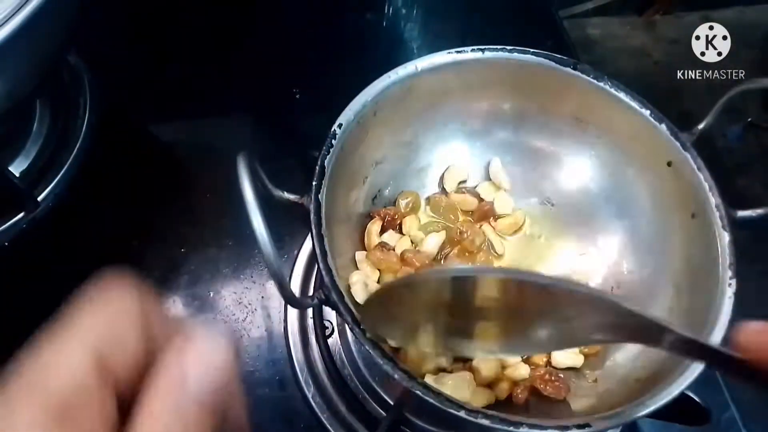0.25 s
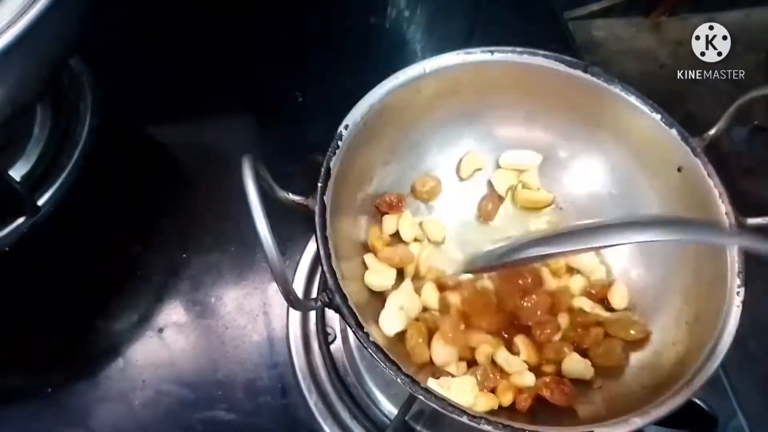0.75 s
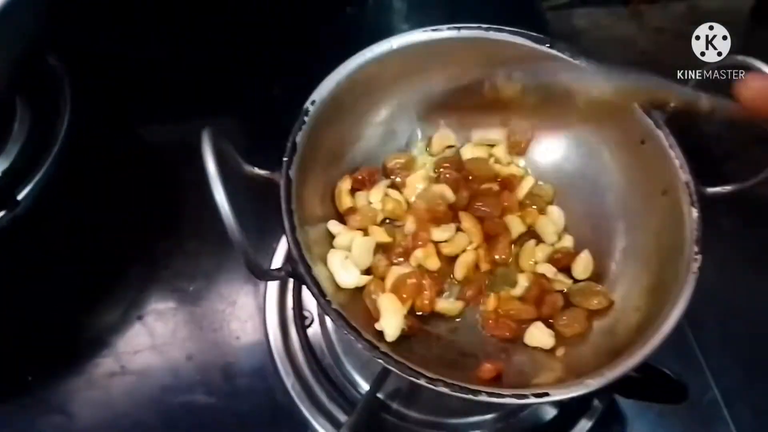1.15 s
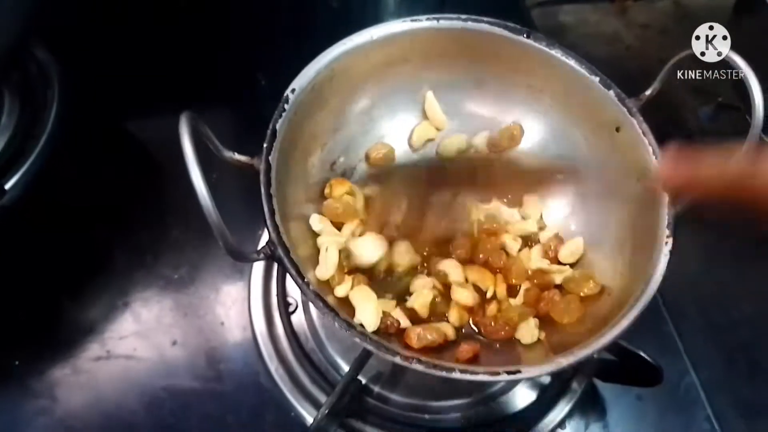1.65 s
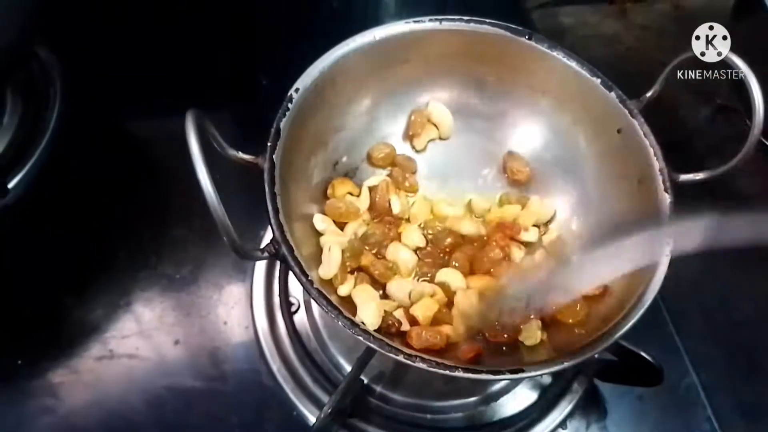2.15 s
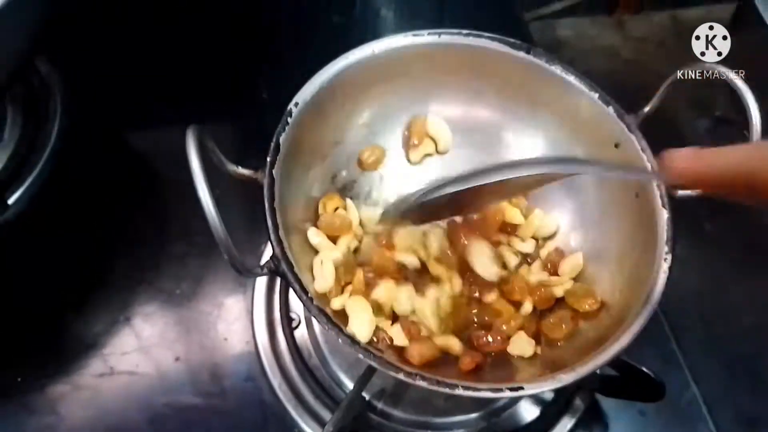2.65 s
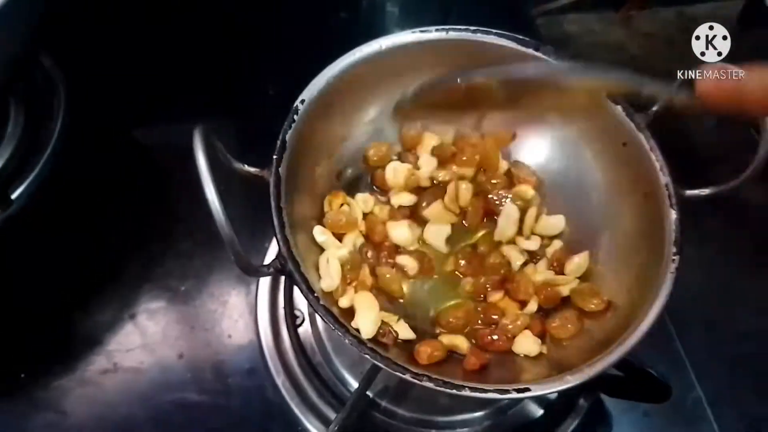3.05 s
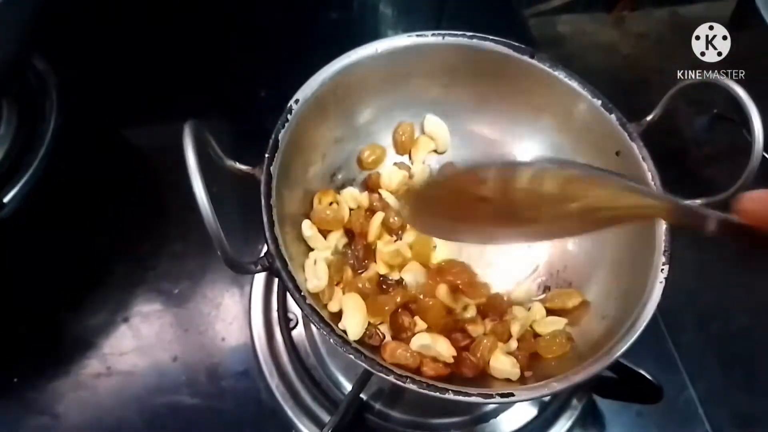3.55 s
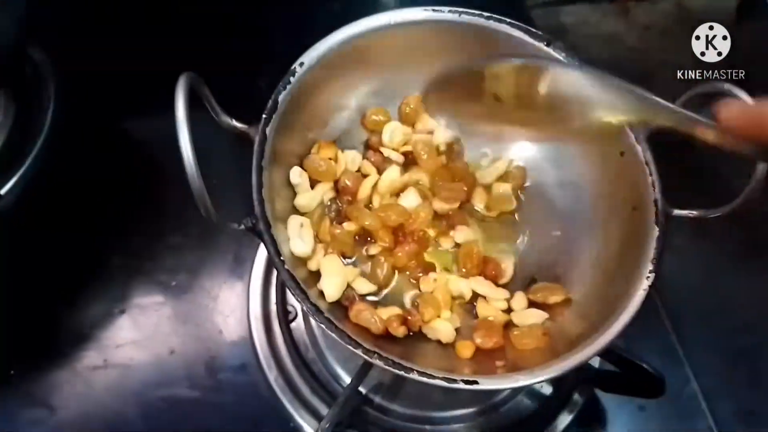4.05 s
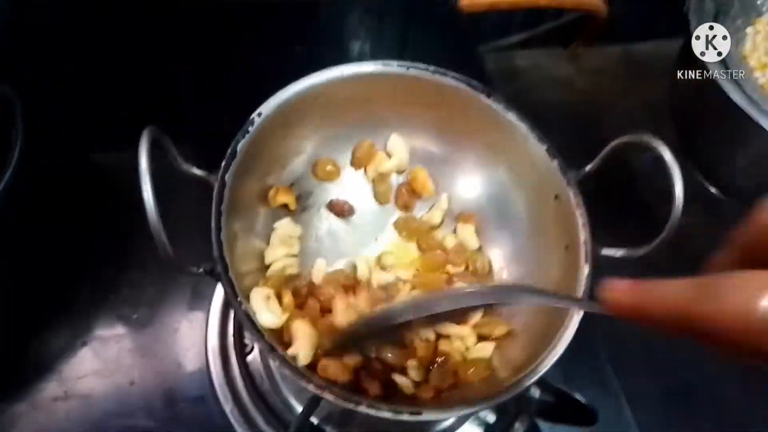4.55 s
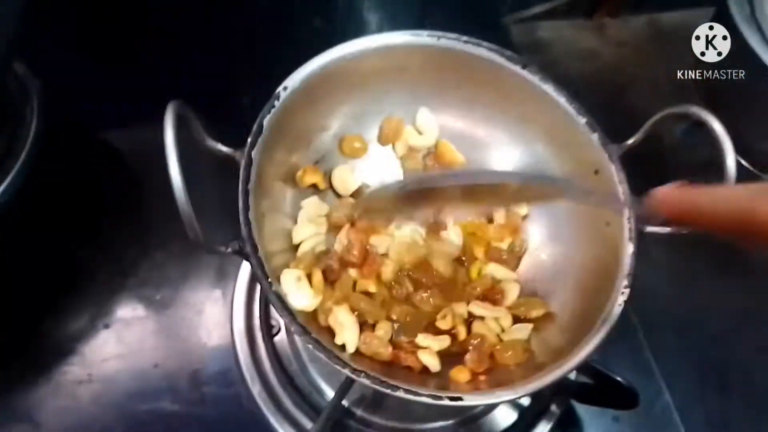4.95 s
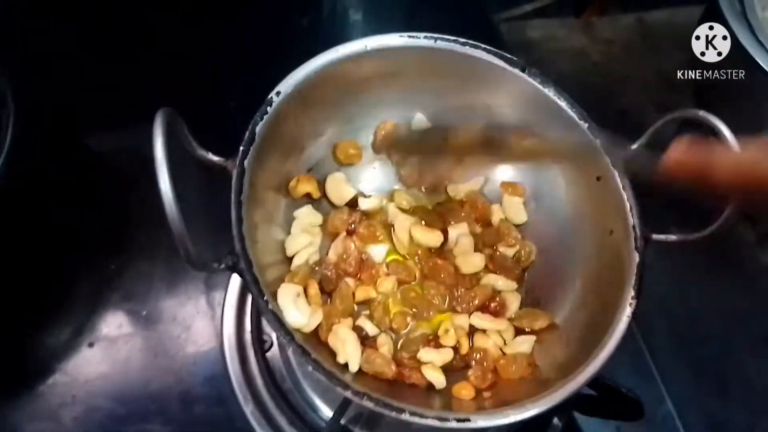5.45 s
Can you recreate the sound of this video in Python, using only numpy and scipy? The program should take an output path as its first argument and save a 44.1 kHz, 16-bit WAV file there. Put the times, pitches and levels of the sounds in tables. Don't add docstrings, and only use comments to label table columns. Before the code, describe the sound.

Nuts and raisins fry close up: loud snapping fat, dry ticking, brief spoon clinks and dull pan knocks above a faint burner hum.

```python
import sys
import numpy as np
from scipy import signal
from scipy.fft import rfft, irfft, next_fast_len
from scipy.io import wavfile

SR = 44100
rng = np.random.default_rng(int(sys.argv[2]) if len(sys.argv) > 2 else 0)


def transcribe(signal):
    frames = np.atleast_2d(signal).T
    limited = np.clip(frames, -1, 1)
    pcm = np.round(limited * 32767).astype(np.int16)
    wavfile.write(sys.argv[1], SR, pcm)


def to_linear_factor(level_db):
    exponent = np.asarray(level_db, float) / 20
    return 10 ** exponent


N = 251610

# (t/s, peak level/dB, low part level/dB, top part level/dB)
CRACKS = [(.0303, 4, -2, -6.5), (0.1247, -10, -12.5, -19), (0.1744, -12, -38, -27), (0.182, -15, -14, -30),
          (0.235, -8.5, -50, -23), (0.3431, -12.5, -18, -23), (0.6953, -5.5, -14, -15.5),
          (0.8186, -9.5, -8.5, -12), (1.0239, -14, -29, -26), (1.329, 5, 2, -7), (1.391, -5, -9, -27),
          (1.4447, 2, -10.5, -5), (1.4929, 4.5, -10.5, -3.5), (1.5811, 1.5, -4.5, -2),
          (1.6985, -16, -14, -26), (1.7255, 5, -0.5, -6.5), (1.953, -10.5, -41, -26),
          (1.9705, 3.5, -5.5, -10), (2.7018, -8, -26.5, -16), (2.7649, -7, -45, -29),
          (3.0132, -9.5, -42, -23), (3.039, -8, -30, -36), (3.1869, 5, -14.5, -9.5), (3.6644, -8, -41, -30),
          (3.6687, -10, -43, -32), (3.701, -2, -48, -27), (3.7145, -5.5, -17.5, -31),
          (3.8348, -10.5, -45, -15), (4.3539, -11.5, -17.5, -21), (5.0707, -6.5, -17.5, -27)]
# (t/s, peak level/dB, low part level/dB, low part f/Hz)
TICKS = [(0.1156, -20, -15.5, 4260), (0.2021, -7.5, -15, 3900), (0.2832, -22, -23, 4600),
         (0.799, -23, -26, 5900), (1.0462, -18, -21.5, 5700), (1.1304, -14.5, -13.5, 6060),
         (1.207, -11.5, -21.5, 4870), (1.274, -13, -22, 4300), (1.477, -39, -17.5, 5230),
         (1.7074, -11.5, -19.5, 4360), (1.772, -28, -25, 5500), (1.801, -41, -38, 4970),
         (1.815, -17.5, -16.5, 4380), (1.96, -19, -21.5, 3970), (2.3529, -15, -23, 4330),
         (2.374, -31, -16, 5400), (2.4014, -23, -10, 5650), (2.59, -24.5, -30.5, 5960),
         (3.178, -31, -20, 4920), (3.3027, -31, -35.5, 3300), (3.3623, -21.5, -20.5, 5460),
         (4.3301, -38, -18.5, 6600), (4.6628, -16, -24.5, 5430), (4.9134, -18.5, -22, 7500),
         (5.1227, -24, -44, 4050), (5.1385, -18.5, -25.5, 4440), (5.338, -39, -15.5, 6100),
         (5.3911, -21, -24, 3900), (5.4687, -10.5, -19.5, 3100), (5.565, -20.5, -20, 4300)]
# (t/s, peak level/dB, low part level/dB, low part f/Hz)
TUMBLES = [(.6492, -33.5, -53, 2220), (2.1337, -23, -26, 4470), (2.461, -29, -39, 3040),
           (4.0271, -33, -42, 3900), (4.1123, -31.5, -48, 1820), (4.139, -34, -38, 4700),
           (4.4633, -15.5, -42, 2300), (4.491, -25, -39.5, 2030), (4.646, -26, -48, 3600),
           (4.6893, -23.5, -32, 2430), (4.789, -29, -42, 2500), (4.9547, -32, -38.5, 1760),
           (5.2192, -31, -57, 2180), (0.671, -27.5, -41, 5030), (1.86, -38, -38, 5500),
           (4.228, -44, -50, 6000), (4.846, -37, -47, 5900), (5.534, -25, -33, 3730),
           (5.6832, -34, -40, 6600)]
# (t/s, peak level/dB, low part level/dB, low part f/Hz)
MORE_TICKS = [(0.12, -19, -22, 4500), (0.1261, -8, -16.5, 3950), (.2046, -10, -22, 3370),
              (1.0922, -33, -34, 5000), (1.7805, -20, -18, 5270), (2.0224, -20, -25, 4500),
              (2.7235, -20, -33, 4800), (2.9567, -33, -45, 4500), (3.5491, -57, -48, 3000),
              (3.845, -26, -39, 4630), (4.014, -30.5, -41, 3480), (4.0647, -31, -44, 5000),
              (4.3375, -27, -44, 4200), (4.7456, -34, -42, 4000), (5.3251, -43, -48, 3000),
              (5.4057, -29, -38, 5000), (5.417, -32, -41, 4500), (3.785, -40, -34, 5100),
              (.7868, -32, -29, 5000), (2.3215, -30, -34, 4000)]
# (t/s, peak level/dB, top part level/dB)
SPITS = [(0.1615, -18, -13.5), (0.1943, -21, -17), (.4205, -44, -24), (0.4265, -20, -25), (.489, -26, -24),
         (0.88, -17.5, -20), (0.9416, -17.5, -28), (1.1, -12.5, -24), (1.1226, -19, -25),
         (1.1983, -20, -16), (1.548, -37, -14), (1.692, -14, -18), (1.9012, -14.5, -34), (2.0591, -26, -25),
         (2.089, -33, -26), (2.1382, -20, -19.5), (2.3017, -18, -18), (2.389, -23, -27),
         (2.4674, -14, -17.5), (2.483, -26, -19), (2.648, -32, -28), (3.233, -13.5, -20),
         (3.6868, -12, -31), (3.748, -17, -32), (3.848, -48, -33), (3.8888, -65, -12.5), (3.9734, -36, -31),
         (4.2186, -32.5, -38), (4.264, -42, -26.5), (5.345, -23, -27), (4.5106, -15.5, -34),
         (5.0334, -15.5, -30), (2.153, -21.5, -35), (1.7726, -20, -19), (2.5897, -26, -31),
         (4.5215, -21, -48), (4.536, -27, -46), (4.476, -23, -55), (5.0947, -25, -46), (1.2167, -18, -40),
         (2.1588, -25, -43), (3.2737, -23.5, -43)]
# (t/s, peak level/dB, top part level/dB)
STRAYS = [(0.0028, -23, -41), (0.079, -28, -40), (0.1701, -17, -31), (0.1982, -11, -23), (0.3068, -31, -49),
          (0.4542, -25, -40), (0.5465, -30, -39), (0.6311, -39, -52), (0.8284, -22, -36),
          (0.8621, -29, -48), (1.0847, -28, -48), (1.228, -18, -39), (1.253, -24, -38), (1.451, -10, -16),
          (1.465, -13, -27), (1.5283, -16, -28), (1.91, -27, -41), (1.9222, -26, -37), (1.9297, -27, -34),
          (2.114, -21, -37), (2.1296, -22, -31), (2.1691, -27, -52), (2.6612, -33, -51), (2.687, -32, -44),
          (2.7094, -14, -29), (2.7277, -14, -47), (2.8612, -29, -56), (2.991, -22, -50), (3.0502, -18, -38),
          (3.4635, -31, -57), (3.4683, -34, -62), (3.7282, -18, -45), (3.841, -23, -38), (3.9305, -35, -50),
          (3.9584, -28.5, -49), (3.9903, -31, -40), (4.2317, -30, -43), (4.2705, -27, -50),
          (4.2865, -36, -59), (4.2938, -38, -58), (4.365, -20, -37), (4.3958, -21, -46), (4.448, -36, -48),
          (4.5856, -34, -67), (4.6732, -25, -51), (4.7573, -33, -64), (4.799, -32, -47), (4.8109, -36, -59),
          (4.8179, -38, -62), (4.9655, -31, -57), (4.9887, -41, -62), (5.1734, -19, -54),
          (5.1812, -20, -48), (5.2991, -40, -61), (5.3519, -20, -40), (5.4766, -18, -38), (5.48, -14, -41),
          (5.4873, -23, -46)]
# (t/s, peak level/dB)
MUFFLED = [(0.1024, -21), (.3934, -21), (.442, -20), (.46, -16.5), (.5319, -25), (0.5583, -23.5),
           (0.9123, -13.5), (0.964, -28), (1.1564, -18.5), (1.6783, -16), (2.551, -34), (2.8535, -17),
           (2.9061, -16), (2.918, -15), (3.479, -24.5), (3.591, -31.5), (3.6224, -20), (3.6443, -22),
           (3.711, -15), (3.785, -25.5), (3.8184, -18.5), (4.402, -20.5), (4.4981, -16), (4.604, -26),
           (5.015, -29), (5.166, -17), (5.5579, -17.5)]
# (t/s, peak level/dB)
THUMPS = [
    (.0305, -42.5),
    (.6956, -52),
    (1.3291, -40.5),
    (1.4449, -42),
    (1.4931, -39),
    (1.5813, -34),
    (1.7257, -41.5),
    (1.9708, -37.5),
    (3.1873, -38.5),
]
# (t/s, sizzle level/dB)
HEAT = [(0, -29.5), (.6, -42.5), (1.2, -42), (1.7, -27.5), (2.2, -49.5), (2.9, -43), (3.5, -49),
        (3.9, -40.5), (4.4, -51), (4.9, -45.5), (5.71, -50)]
# (t/s, hold/s, stirred-up fizz level/dB, pressure on steel level/dB)
STROKES = [(0.001, 0.1, -47, -51.5), (0.688, 0.021, -20.5, -38), (1.02, 0.031, -28, -46),
           (1.326, 0.079, -36, -33.5), (1.52, 0.16, -50, -51.5), (1.717, 0.065, -35, -79),
           (1.967, 0.096, -26.5, -36), (2.298, 0.087, -27, -56.5), (2.697, 0.058, -33, -50.5),
           (2.954, 0.051, -38.5, -52), (3.043, 0.17, -22.5, -65), (3.637, 0.059, -36, -82),
           (4.346, .05, -33, -66), (4.456, 0.037, -64, -52.5), (5.044, 0.044, -66, -60),
           (5.454, 0.17, -47.5, -60)]
# (f/Hz, level/dB)
SIZZLE = [(4000, -12), (6000, -.5), (8500, 0), (11000, -1.5), (15500, -11.5)]
# (f/Hz, level/dB)
RATTLE = [(1500, 1), (2500, 5), (4000, 13), (6500, 10), (10000, -19), (15000, -15)]
# (t/s, first mode level/dB, upper modes level/dB, ring t60/s, contact/ms)
CLINKS = [
    (0.0264, -37, -46, 0.36, 4.6),
    (0.6947, -18.5, -23, 0.2, 3.3),
    (1.046, -47, -51, 0.7, 2.2),
    (1.3313, -20, -31, 0.057, 0.9),
    (1.4164, -28, -31, 0.15, 4.8),
    (1.6598, -36, -41, 0.18, 2.8),
    (1.724, -25, -42, 0.056, 1.8),
    (1.958, -31, -27.5, 0.16, 15),
    (1.975, -22, -30, 0.19, 1.2),
    (5.004, -40.5, -60, 0.17, 3.3),
]
# (f/Hz, level/dB)
SPOON_FIRST = [(4370, -2), (4376, -32)]
# (f/Hz, level/dB)
SPOON_UPPER = [(6057, 4), (5835, -6), (8288, -6), (8600, -12)]
# (t/s, length/s, f/Hz, width/Hz, level/dB)
RUBS = [(0.414, .12, 4440, 110, -56), (2.62, 0.067, 4280, 37, -69), (2.7, 0.14, 1770, 320, -54.5),
        (2.98, 0.17, 4360, 60, -49), (3.001, 0.22, 2120, 220, -55.5), (2.715, .13, 274, 35, -51),
        (2.936, 0.12, 289, 69, -45.5), (1.041, 0.047, 400, 200, -49.5), (3.606, 0.12, 396, 57, -50),
        (3.602, 0.076, 777, 76, -54), (3.697, 0.051, 2300, 92, -67), (3.977, 0.11, 4364, 15, -47),
        (4.076, 0.045, 1820, 100, -58), (4.345, 0.078, 1980, 160, -53), (4.458, 0.22, 280, 57, -51.5),
        (4.66, 0.098, 1870, 120, -53), (4.7, 0.1, 4010, 160, -54.5), (2.99, 0.15, 6440, 350, -45),
        (3.04, .12, 11700, 600, -48), (3.09, .07, 13000, 500, -48), (3.108, 0.035, 8800, 1800, -35.5),
        (2.3, 0.092, 4020, 250, -44.5), (2.42, .15, 3520, 100, -63), (2.7, 0.052, 2500, 130, -47.5),
        (2.81, 0.066, 2450, 60, -53.5), (2.94, 0.042, 2500, 71, -53), (4.345, 0.064, 1500, 92, -55),
        (4.44, .06, 2300, 150, -56.5), (4.62, 0.31, 1480, 60, -60), (4.75, 0.15, 870, 47, -58.5),
        (4.67, 0.062, 4370, 33, -59), (.72, 0.2, 1136, 120, -58.5), (1.33, .07, 3100, 300, -41),
        (3.7, 0.089, 4970, 440, -43.5), (3.06, .1, 4950, 200, -53), (5.29, 0.045, 8100, 60, -60),
        (4.4, 0.21, 2000, 280, -59.5), (2.3, 0.18, 6040, 850, -53.5), (5.07, .12, 6400, 630, -51.5),
        (4.91, 0.067, 6700, 560, -52)]
# (t/s, f/Hz, level/dB)
SQUEAL = [
    (2.3, 3010, -68),
    (2.36, 2910, -54),
    (2.45, 2770, -58),
    (2.55, 2730, -66),
    (2.65, 2640, -57),
    (2.72, 2630, -72),
]
# (t/s, peak level/dB, favoured f/Hz)
KNOCKS = [(0.028, -25, 1500), (0.695, -22, 1010), (0.818, -44, 1150), (1.024, -36, 1600),
          (1.327, -25, 2600), (1.388, -18.5, 900), (1.973, -23, 796), (2.302, -30.5, 1350),
          (2.709, -34, 1850), (2.947, -30.5, 700), (3.647, -45, 600), (4.348, -35.5, 1750),
          (4.463, -30, 800), (4.71, -42, 1850), (5.468, -40, 1500)]
# (f/Hz, level/dB, t60/s)
PAN = [(270, -2.5, 0.22), (321.6, -5, 0.3), (396, -14, 0.19), (642, -16.5, 0.058), (786, -13.5, 0.12),
       (934, 0.5, 0.035), (1119, -10, 0.066), (1500, 3, 0.013), (1640, -12.5, 0.086), (1850, 0, 0.015),
       (2300, -7.5, 0.028), (3100, -7, 0.034)]
# (f/Hz, t60/s)
KITCHEN = [(300, 0.67), (1500, 0.37), (4000, 0.13), (9000, 0.14), (15000, 0.093)]
# (f/Hz, level/dB)
HUM = [(15, -57), (25, -7), (55, -34), (126, -56), (169, -25.5), (253, -4.5), (349, -0.5), (666, -16),
       (945, -4.5), (1200, -10.5), (3720, -29), (7100, -24), (8350, -0.5), (9810, -38.5), (15500, -19.5)]
# (t/s, level/dB)
HANDLING = [(0, -79), (4.3, -80), (5.0, -70), (5.3, -72), (5.71, -68)]

POCKET_HZ, CRACK_HZ = 6650, 5900
CRACK_S, CRACK_GROWTH_S = .00055, .0002
TICK_TOP_DB, TUMBLE_TOP_DB, SPIT_LOW_DB, MUFFLED_LOW_DB, MUFFLED_TOP_DB = -12.5, -28, -39, -5.5, -10.5
STRAY_DB, STRAY_LOW_DB = -2.5, -21
STROKE_ATTACK_S, STROKE_RELEASE_S = 0.0046, 0.041
SETTLE_S, SETTLE_DB = 0.074, -18
REST_RATTLE_DB, REST_RUMBLE_DB = -65.5, -60
RATTLE_FIZZ_SHARE, RATTLE_DB = 0.55, -6.5
SPATTER_DB = -17
SQUEAL_WIDTH_HZ = 170
KNOCK_FALL_DB_PER_OCTAVE = 4.5
THUMP_S = 0.00025
WALL_TOP_HZ = 11400
HUM_DB = -54.5
RING_HZ, RING_WIDTH_HZ, RING_DB = 120, 5.5, -72.5
STAND_FOLLOWS, STAND_LAG_S = 0.54, 0.019
PORT_HZ, PORT_WIDTH_HZ, PORT_DB = 8400, 600, 15
CUTOFF_HZ, STEEP_TOP_HZ = 16250, 16600
CEILING = .71


def in_time(rows):
    s, *columns = np.transpose(rows)
    return [np.interp(np.arange(N) / SR, s, c) for c in columns]


def at_hz(points, hz):
    table_hz, value = np.transpose(points)
    return np.interp(np.log(hz + 1), np.log(table_hz), value)


def rms_one(x):
    return x / np.sqrt(np.mean(x ** 2) + 1e-20)


def band(x, low_hz, high_hz):
    return signal.sosfilt(signal.butter(2, [low_hz, min(high_hz, .45 * SR)], "band", fs=SR, output="sos"), x)


def low_pass(x, hz, order):
    return signal.sosfilt(signal.butter(order, hz, fs=SR, output="sos"), x)


def resonance(x, hz, width_hz):
    r = np.exp(-np.pi * width_hz / SR)
    poles = [1, -2 * r * np.cos(2 * np.pi * hz / SR), r * r]
    return signal.lfilter(np.array([1, 0, -1]) * (1 - r * r) / 2, poles, x)


def port(x):
    return x + to_linear_factor(PORT_DB) * resonance(x, PORT_HZ, PORT_WIDTH_HZ)


def coloured(x, spectrum):
    size = next_fast_len(N)
    gain = to_linear_factor(at_hz(spectrum, np.fft.rfftfreq(size, 1 / SR)))
    return rms_one(irfft(rfft(x, size) * gain, size)[:N])


def grains(per_s, spread_db, low_hz, high_hz, cycles, count):
    sizes = to_linear_factor(spread_db * np.minimum(rng.exponential(1, N), 4)) * rng.choice([-1, 1], N)
    clicks = sizes * (rng.random(N) < per_s / SR) + 1e-18
    dealt = rng.integers(0, count, N)
    pitches = np.geomspace(low_hz, high_hz, count)
    return rms_one(sum(resonance(clicks * (dealt == k), hz, hz / cycles) for k, hz in enumerate(pitches)))


def add(out, s, sound):
    i = int(s * SR)
    out[i:i + len(sound)] += sound[:N - i]


def bursts():
    rows = [(s, db, low_db, CRACK_HZ, top_db) for s, db, low_db, top_db in CRACKS]
    rows += [(s, db, low_db, hz, max(db, low_db) + TICK_TOP_DB) for s, db, low_db, hz in TICKS]
    rows += [(s, db, low_db, hz, db + TUMBLE_TOP_DB) for s, db, low_db, hz in TUMBLES]
    rows += [(s, db, max(db, top_db) + SPIT_LOW_DB, POCKET_HZ, top_db) for s, db, top_db in SPITS]
    rows += [(s, db, low_db, hz, max(db, low_db) + TICK_TOP_DB) for s, db, low_db, hz in MORE_TICKS]
    rows += [(s - .0003, db + STRAY_DB, db + STRAY_LOW_DB, POCKET_HZ, top_db) for s, db, top_db in STRAYS]
    return rows + [(s, db, db + MUFFLED_LOW_DB, POCKET_HZ, db + MUFFLED_TOP_DB) for s, db in MUFFLED]


def pops():
    out, t, rows = np.zeros((3, N)), np.arange(400) / SR, bursts()
    noise, luck = rng.standard_normal((len(rows), len(t))), rng.random((len(rows), 2))
    for k, (s, peak_db, low_db, low_hz, top_db) in enumerate(rows):
        crack = noise[k] * np.exp(-t / (CRACK_S + CRACK_GROWTH_S * to_linear_factor(peak_db)))
        echo_s = .001 + .002 * luck[k, 1]
        crack = crack + .6 * luck[k, 0] * np.roll(crack, int(echo_s * SR))
        body = resonance(resonance(crack, low_hz, 0.44 * low_hz), low_hz, 0.44 * low_hz)
        low = 0.15 * band(crack, 2760, 9070) + body
        middle = band(band(crack, 6700, 9600), 5200, 10200)
        top = band(band(crack, 10000, 15000), 9000, 17000)
        parts = [(low, low_db + 4.0), (middle, peak_db + 2.5), (top, top_db + 4.0)]
        add(out[k % 3], s, sum(to_linear_factor(db) * p / np.abs(port(p)).max() for p, db in parts))
    return band(out, 220, 12640)


def thumps():
    out, t = np.zeros(N), np.arange(200) / SR
    for s, peak_db in THUMPS:
        add(out, s, to_linear_factor(peak_db + 8) * t / THUMP_S * np.exp(1 - t / THUMP_S))
    return out


def stirring():
    t = np.arange(N) / SR
    sizzle, rattle, rumble = to_linear_factor(in_time(HEAT)[0]), to_linear_factor(REST_RATTLE_DB), to_linear_factor(REST_RUMBLE_DB)
    for s, hold, fizz_db, press_db in STROKES:
        rise = np.clip((t - s) / STROKE_ATTACK_S, 0, 1)
        after = np.maximum(t - s - hold, 0)
        stroke = rise * np.exp(-after / STROKE_RELEASE_S)
        settling = to_linear_factor(SETTLE_DB) * rise * np.exp(-after / SETTLE_S)
        nuts_db = RATTLE_FIZZ_SHARE * fizz_db + (1 - RATTLE_FIZZ_SHARE) * press_db + RATTLE_DB
        sizzle = sizzle + to_linear_factor(fizz_db) * (stroke + settling)
        rattle = rattle + to_linear_factor(nuts_db) * stroke
        rumble = rumble + to_linear_factor(press_db) * stroke
    return 20 * np.log10([sizzle, rattle, rumble])


def frying(sizzle_db, rattle_db):
    sizzle = coloured(grains(6000, 2.7, 4400, 16700, cycles=5.8, count=12), SIZZLE)
    rattle = coloured(grains(2500, 5.0, 1320, 6770, cycles=36.0, count=16), RATTLE)
    spatter = coloured(grains(160, 4.9, 5200, 17700, cycles=2.3, count=6), SIZZLE)
    return to_linear_factor(sizzle_db - 17.0) * (sizzle + to_linear_factor(SPATTER_DB) * spatter) + to_linear_factor(rattle_db - 3.0) * rattle


def spoon():
    out, t = np.zeros(N), np.arange(int(.4 * SR)) / SR
    phases = 2 * np.pi * rng.random((len(CLINKS), 6))
    for (s, first_db, upper_db, t60, contact_ms), phase in zip(CLINKS, phases):
        modes = [(hz, db + first_db + 4.5) for hz, db in SPOON_FIRST]
        modes += [(hz, db + upper_db) for hz, db in SPOON_UPPER]
        ring = sum(to_linear_factor(db) * np.sin(2 * np.pi * hz * t + p) for (hz, db), p in zip(modes, phase))
        swell = 1 - np.exp(-t * 1000 / max(contact_ms, .1))
        add(out, s, ring * swell * to_linear_factor(-60 * t / max(t60, .03)))
    return out


def rubs():
    out, friction = np.zeros(N), rng.standard_normal((len(RUBS), SR // 2))
    for (s, length, hz, width_hz, level_db), white in zip(RUBS, friction):
        sung = rms_one(resonance(resonance(white, hz, width_hz), hz, 2 * width_hz))[:int(length * SR)]
        swell = np.sqrt(np.hanning(len(sung))) * np.linspace(1.3, .7, len(sung))
        judder = np.clip(rms_one(band(white, 3.1, 29))[:len(sung)], -1, 2)
        add(out, s, to_linear_factor(level_db) * sung * swell * (1 + min(width_hz / 250, .6) * judder))
    return out


def squeal():
    hz, level_db = in_time(SQUEAL)
    wobble = low_pass(rng.standard_normal((2, N)), SQUEAL_WIDTH_HZ / 2, 2)
    phase, t = 2 * np.pi * np.cumsum(hz) / SR, np.arange(N) / SR
    on = (t > SQUEAL[0][0]) & (t < SQUEAL[-1][0])
    return on * to_linear_factor(level_db) * rms_one(wobble[0] * np.sin(phase) + wobble[1] * np.cos(phase))


def pan(rumble_db):
    times, peak_db, favoured_hz = np.transpose(KNOCKS)
    at = [int(s * SR) for s in times]
    strengths_db = rng.normal(0, 4.6, (len(KNOCKS), len(PAN)))
    scrape = to_linear_factor(rumble_db - 30) * rng.standard_normal(N)
    out = np.zeros(N)
    for k, (hz, level_db, t60) in enumerate(PAN):
        fall_db = KNOCK_FALL_DB_PER_OCTAVE * np.abs(np.log2(hz / favoured_hz))
        force = scrape.copy()
        force[at] += to_linear_factor(peak_db - 11 + strengths_db[:, k] - fall_db)
        r, w = to_linear_factor(-60 / (min(t60, .18) * SR)), 2 * np.pi * hz / SR
        out += to_linear_factor(level_db) * signal.lfilter([0, np.sin(w)], [1, -2 * r * np.cos(w), r * r], force)
    return band(band(out, 268, 3400), 280, 3600)


def kitchen(x):
    t = np.arange(int(.4 * SR)) / SR
    edges = 150 * 2 ** np.arange(0, 7.1, .5)
    white = rng.standard_normal((2, len(t)))
    tail = np.zeros(len(t))
    for k, (low, high) in enumerate(zip(edges, edges[1:])):
        t60 = at_hz(KITCHEN, np.sqrt(low * high))
        tail += band(white[k % 2], low, high) * to_linear_factor(-60 * t / t60)
    tail = tail * np.clip((t - .003) / 0.00014, 0, 1)
    return signal.fftconvolve(x, tail / np.sqrt(np.sum(tail ** 2)))[:N]


def stand(rumble_db):
    lag = np.exp(-1 / (STAND_LAG_S * SR))
    shaken_db = signal.lfilter([(1 - lag) ** 2], [1, -2 * lag, lag * lag], rumble_db - REST_RUMBLE_DB)
    drone = rms_one(resonance(rng.standard_normal(N), RING_HZ, RING_WIDTH_HZ))
    return to_linear_factor(RING_DB - 3.0 + STAND_FOLLOWS * shaken_db) * drone


def burner_hum():
    hum = to_linear_factor(HUM_DB) * coloured(rng.standard_normal(N), HUM)
    return band(hum, 66, 14000) - 0.97 * resonance(hum, 100, 34)


def handling():
    return to_linear_factor(in_time(HANDLING)[0]) * rms_one(band(rng.standard_normal(N), 25, 70))


def scene():
    sizzle_db, rattle_db, rumble_db = stirring()
    spots = pops()
    metal = spoon() + rubs() + squeal() + pan(rumble_db)
    fry = frying(sizzle_db, rattle_db)
    room = sum(kitchen(to_linear_factor(-3.5) * spot) for spot in spots) + kitchen(to_linear_factor(-11) * metal + to_linear_factor(-7) * fry)
    room = low_pass(room, WALL_TOP_HZ, 1)
    near = port(spots.sum(axis=0) + metal + room + fry)
    return (near + burner_hum() + stand(rumble_db) + handling() + thumps())[None]


def top_cut(x):
    return signal.sosfilt(signal.butter(12, 16620, fs=SR, output="sos"), x)


def record(dry):
    cut = signal.sosfilt(signal.cheby2(10, 50, CUTOFF_HZ, fs=SR, output="sos"), dry)
    rounded = cut / (1 + (cut / CEILING) ** 4) ** .25
    rounded = cut + band(rounded - cut, 900, 18000)
    mix = signal.sosfilt(signal.cheby2(12, 70, STEEP_TOP_HZ, fs=SR, output="sos"), rounded)
    return top_cut(mix)


dry = scene()
out = record(dry)
transcribe(out)
```